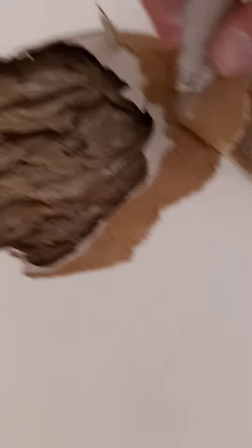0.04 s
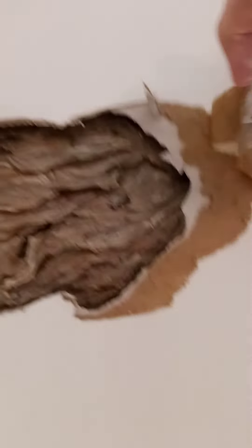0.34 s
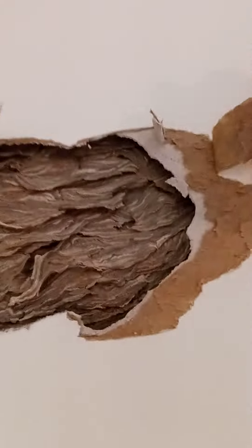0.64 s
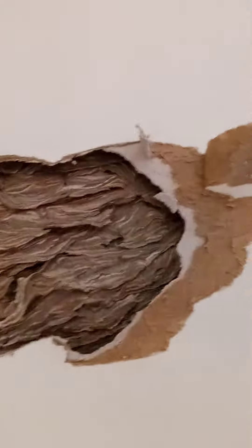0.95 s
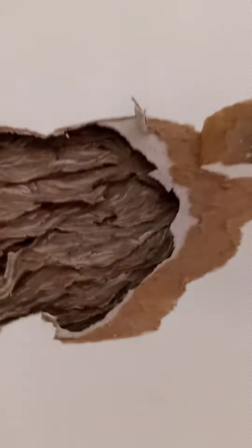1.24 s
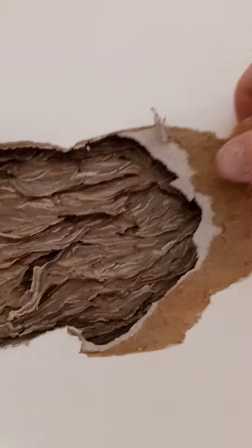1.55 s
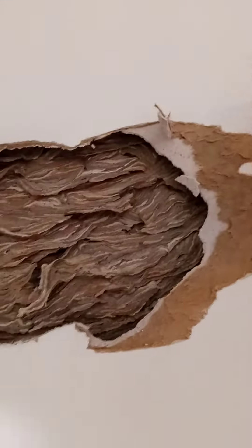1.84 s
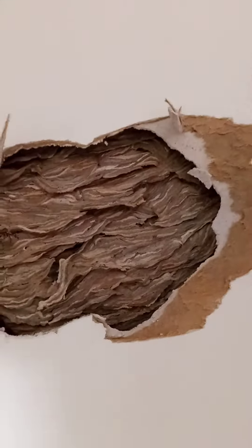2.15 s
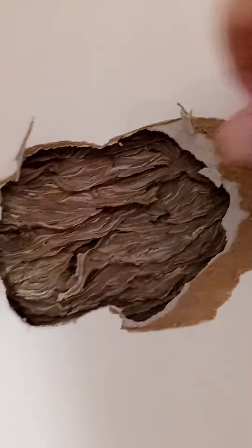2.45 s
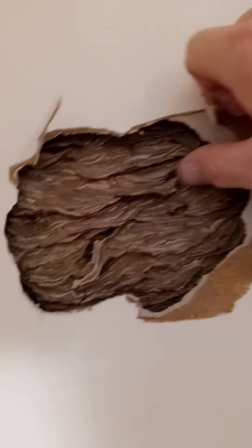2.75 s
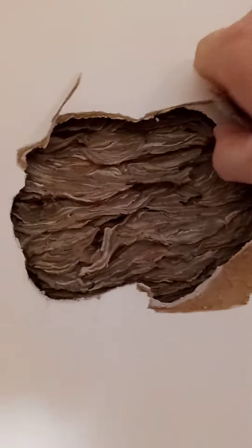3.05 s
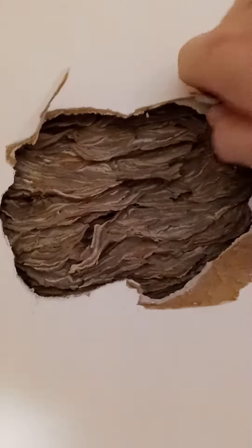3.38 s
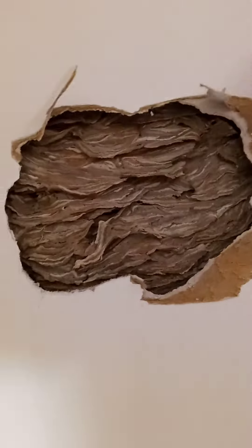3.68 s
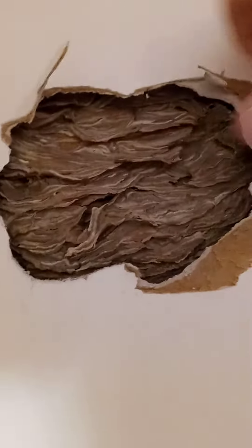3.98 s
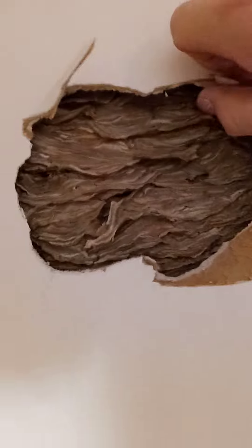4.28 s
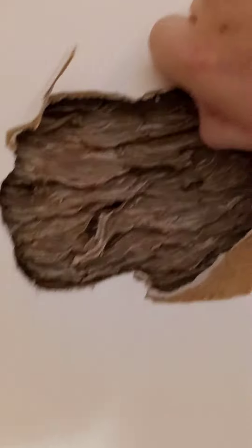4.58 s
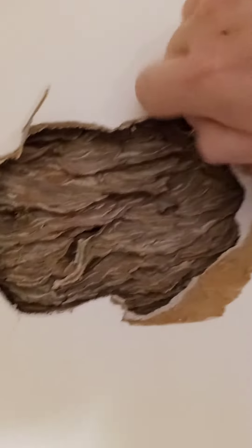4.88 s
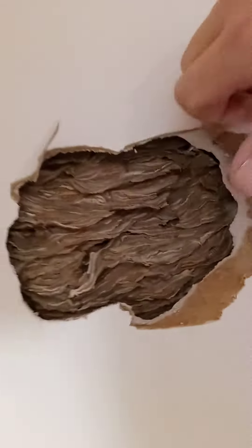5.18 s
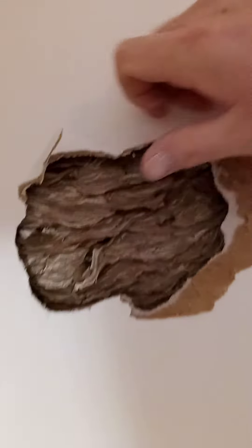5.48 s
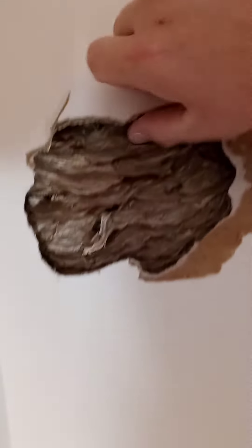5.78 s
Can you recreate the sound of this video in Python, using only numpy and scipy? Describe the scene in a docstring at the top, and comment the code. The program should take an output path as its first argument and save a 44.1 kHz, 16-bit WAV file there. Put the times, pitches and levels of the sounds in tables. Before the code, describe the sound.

In a small room, close to the microphone, dry paper crackles and rips as two strips are pulled from a wall. Fingertips brush the paint and a nail scratches at the edge of a hole in short strokes. Midway, pieces of plasterboard snap off with hollow knocks and a brief crumbling, then again a little later. It ends with another flurry of papery scraping and clicks.

```python
"""Peeling paper off a plasterboard wall

A small room, the microphone close to the hand. Fingers peel the paper facing and pick at the rim of a
hole with a brittle, papery nest behind it. Each pull or scrape is a swarm of fibre breaks, with single
snaps between; bits of board crack off and set the hollow wall booming. Underneath, fingertips brush
the paint and handling of the recorder gives a few soft thumps."""
import sys
import numpy as np
from scipy import signal
from scipy.fft import rfft, irfft
from scipy.io import wavfile
from scipy.ndimage import uniform_filter1d

SR = 44100
rng = np.random.default_rng(int(sys.argv[2]) if len(sys.argv) > 2 else 0)


def persist_wave(psi):
    """Save psi, clipped to +-1, as 16-bit WAV."""
    counts = np.round(np.clip(psi, -1, 1) * 32767).astype(np.int16)
    wavfile.write(sys.argv[1], SR, np.atleast_2d(counts).T)


N = 265746


def from_db(db):
    """Decibels to amplitude."""
    return 10 ** (np.asarray(db) / 20)


def rms_one(x):
    """Scale to an rms of 1."""
    return x / np.sqrt(np.mean(x ** 2) + 1e-20)


def snap_sized(x):
    """Scale a burst to the energy of a hundredth of a second at rms 1."""
    return x * np.sqrt(SR / 100 / (np.sum(x ** 2) + 1e-20))


def evened(x, span_s):
    """Hold the running rms at 1, leaving the fast grain."""
    return x / np.sqrt(np.maximum(uniform_filter1d(x ** 2, int(span_s * SR)), 0) + 1e-12)


def drift(t, per_s):
    """Smooth random wander of rms 1."""
    return rms_one(np.interp(t * per_s, np.arange(len(t)), rng.standard_normal(len(t))))


def at_hz(points, hz):
    """Read a curve on a log-frequency axis."""
    f, value = np.transpose(points)
    return np.interp(np.log(np.maximum(hz, 1)), np.log(f), value)


def add(out, s, x):
    """Mix x into out from time s on."""
    i = max(round(s * SR), 0)
    out[i:i + len(x)] += x[:N - i]


def coloured(x, spectrum, ripple_db=0, size=2048):
    """Minimum-phase filter of unit power gain; ripple stands for the chance modes of a crumpled scrap."""
    hz = np.fft.rfftfreq(size, 1 / SR)
    ripple = ripple_db * np.interp(hz / 190, np.arange(size), rng.standard_normal(size))
    cepstrum = irfft(np.log(from_db(at_hz(spectrum, hz) + ripple)))
    cepstrum[1:size // 2] *= 2   # fold onto positive time: nothing rings ahead of a click
    cepstrum[size // 2 + 1:] = 0
    response = irfft(np.exp(rfft(cepstrum)))
    return signal.fftconvolve(x, response / np.linalg.norm(response))[:len(x)]


def flap(x, hz, width_hz):
    """Resonance of a loose flap or fibre of paper; its pitch may move."""
    radius = np.exp(-np.pi * width_hz / SR)
    turn = np.exp(2j * np.pi * np.cumsum(hz * np.ones(len(x))) / SR)
    return 2 * np.real(turn * signal.lfilter([1 - radius], [1, -radius], x / turn))


def struck(modes, t, scatter_db=2.5):
    """Damped sines whose strengths scatter with the spot touched."""
    out = np.zeros(len(t))
    for hz, db, t60 in modes:
        age = t[:int(t60 * SR) + 2]
        gain = from_db(db + scatter_db * rng.standard_normal())
        add(out, 0, gain * np.sin(2 * np.pi * hz * age) * np.exp(-np.log(1000) * age / t60))
    return out


def shaken(force, modes, t, scatter_db=2.5):
    """The ringing of a body driven by a force."""
    return signal.fftconvolve(force, struck(modes, t, scatter_db))[:len(t)]


def fibre_breaks(count, per_s, spread_db):
    """Random clicks: many small, a few large."""
    sizes = from_db(spread_db * np.minimum(rng.exponential(1, count), 4.5)) * rng.choice([-1, 1], count)
    return sizes * (rng.random(count) < per_s / SR)


# Room tone at the microphone: f/Hz, level/dB
AIR_COLOUR = [(25, -6), (90, -8.5), (200, -2), (430, -4.5), (700, -8), (1500, -8), (3000, -16), (5500, -15),
              (10000, -31), (15000, -19.5)]


def room_tone():
    """The still air of the house, a faint dark noise."""
    return from_db(-72.5) * coloured(rng.standard_normal(N), AIR_COLOUR)


# Decay of the small room: f/Hz, t60/s
ROOM_DECAY = [(120, 0.12), (400, 1), (1500, 0.01), (5000, 0.58), (14000, 0.1)]
# Its echo, relative to the close sound: f/Hz, level/dB
ROOM_ECHO = [(90, -20), (220, -12.5), (400, -13.5), (1500, -13.5), (5000, -19), (14000, -29)]


def room_echo(x, swell_s):
    """Echoes build up as sound returns from the far walls, then die band by band."""
    t, response = np.arange(SR * 3 // 4) / SR, 0
    edges = np.geomspace(70, 17000, 11)
    for low, high in zip(edges, edges[1:]):
        hz = np.sqrt(low * high)
        shape = (1 - np.exp(-(t / swell_s) ** 2)) * np.exp(-np.log(1000) * t / at_hz(ROOM_DECAY, hz))
        band = signal.butter(2, [low, high], "band", fs=SR, output="sos")
        echoes = signal.sosfilt(band, rng.standard_normal(len(t)))
        response = response + from_db(at_hz(ROOM_ECHO, hz)) * echoes * shape / np.linalg.norm(shape)
    return signal.fftconvolve(x, response)[:N]


def hollow_echo(x, delay_s=0.000775, echo_db=-20, above_hz=5500):
    """A very short echo between the hand and the hollow wall combs the treble; its path shifts as the hand
    moves."""
    t = np.arange(N) / SR
    treble = x - signal.sosfiltfilt(signal.butter(2, above_hz, fs=SR, output="sos"), x)
    lag_s = delay_s * (1 + 0.019 * drift(t, per_s=9.9))
    return x - from_db(echo_db) * np.interp(t - lag_s, t, treble)


# Boom of the hollow wall: f/Hz, level/dB, t60/s
WALL_MODES = [(131.6, -10, 0.31), (206.8, -2, 0.22), (250, -3, 0.062), (250.6, 1, 0.12), (290, -8, .026),
              (345.7, -4.5, 0.17), (405, -13.5, 0.067), (490, -14.5, .12)]
# Dull rub: f/Hz, level/dB
RUB_COLOUR = [(30, -31.5), (80, -18), (125, -6.5), (160, -6.5), (230, 4), (340, 2), (420, -0.5), (510, 5.5),
              (720, -3), (870, -2.5), (1000, -7), (1300, -1.5), (1700, -8.5), (2400, -13), (6000, -56.5)]
# Soft low thumps close by: fingers handling the recorder, and the dull body of a crack.
# crest t/s, level/dB, f/Hz, half-length/s, scuff re thud/dB
SOFT_THUMPS = [(0.202, -33, 341, 0.012, -17.5), (1.82, -18.5, 260, 0.0062, -33),
               (1.902, -25, 276.2, 0.0074, -10.5), (2.574, -27.5, 254, 0.005, -9),
               (3.889, -35, 276.7, 0.0062, -33), (4.395, -29.5, 435, 0.0033, -14.5),
               (4.472, -32.5, 342, 0.00456, -5), (5.684, -35.5, 201, 0.0053, -31)]


def soft_thumps(ring_db=-18.5):
    """Each thump is a dull thud of a few cycles, with a little scuff and a faint low ring after it."""
    out, t = np.zeros(N), np.arange(N) / SR
    scuff = coloured(rng.standard_normal(N), RUB_COLOUR)
    for s, db, hz, half_s, scuff_db in SOFT_THUMPS:
        envelope = np.exp(1 - np.hypot(1, (t - s) / half_s * 2.5))
        thud = np.sin(2 * np.pi * hz * (t - s))
        out += from_db(db) * envelope * (thud + from_db(scuff_db) * scuff)
        add(out, s, from_db(db + ring_db) * snap_sized(struck(WALL_MODES, t[:SR // 2])))
    return out


# Paper crackle, its top fizz and dust under a fingertip, all at close range: f/Hz, level/dB
CRACKLE_COLOUR = [(500, -43), (1300, -29.5), (1950, 3.5), (2350, -8), (2900, 3.5), (3700, 2.5), (4500, 8),
                  (5900, 4.5), (6500, -2.5), (7200, 2.5), (8000, -25), (10000, -29.5), (16000, -43.5)]
FIZZ_COLOUR = [(2000, -44.5), (6500, -2), (8300, 4), (9600, -5), (11000, -4), (12800, -1), (15800, -2.5)]
DUST_COLOUR = [(500, -20), (1100, 1.5), (2100, 0.5), (3000, -1.5), (4000, -11.5), (8000, -24.5)]
# Touches on the painted wall: start t/s, end t/s, hiss/dB, rumble/dB, paper ring first f/Hz, last f/Hz
FINGER_BRUSHES = [(1.104, 1.144, -56, -73, 5370, 5760), (1.149, 1.237, -51.5, -54, 2200, 2340),
                  (1.321, 1.454, -69, -45.5, 5300, 5300), (1.475, 1.624, -55, -51, 5800, 4770),
                  (2.019, 2.163, -60.5, -51, 5640, 5100), (2.149, 2.38, -63.5, -76, 5700, 4600),
                  (2.262, 2.296, -56, -72, 5040, 4800), (2.632, 2.884, -69, -65, 5330, 5300),
                  (2.789, 2.83, -53.5, -54, 2500, 3200), (3.424, 3.565, -47, -39.5, 5550, 4930),
                  (3.573, 3.888, -61, -65, 5250, 5700), (3.881, 4.108, -76, -65.5, 5300, 5350),
                  (4.087, 4.247, -61.5, -56.5, 5800, 5400), (4.896, 5.13, -50, -51, 4700, 5450),
                  (5.095, 5.226, -49.5, -78.5, 5100, 4700), (5.348, 5.565, -63, -81, 4900, 5550),
                  (5.664, 5.741, -49, -44.5, 5380, 4370)]


def finger_brushes():
    """Skin on paint gives a grainy hiss and a faint rumble in the wall; each touch swells and fades."""
    out, t = np.zeros(N), np.arange(SR // 2) / SR
    for start, end, hiss_db, rumble_db, first_hz, last_hz in FINGER_BRUSHES:
        pressure = np.abs(np.sin(np.pi * np.minimum(t / (end - start), 1))) ** 0.79
        friction = rms_one(fibre_breaks(len(t), per_s=5300, spread_db=3))
        friction *= from_db(drift(t, per_s=36) + 3.2 * drift(t, per_s=45))
        skin = coloured(friction, CRACKLE_COLOUR, ripple_db=3.5)
        hz = np.interp(t, [0, end - start], [first_hz, last_hz])
        hz *= np.exp(0.044 * drift(t, per_s=40))   # the contact patch keeps shifting
        broad = rms_one(flap(skin, hz=5500, width_hz=2100))
        ring = rms_one(flap(skin, hz, width_hz=500))
        specks = fibre_breaks(len(t), per_s=230, spread_db=1.5)
        dust = rms_one(coloured(specks, DUST_COLOUR, ripple_db=7))
        fizz = coloured(friction, FIZZ_COLOUR)
        hiss = rms_one(broad + from_db(-2) * ring) + from_db(-13) * dust + from_db(-14.5) * fizz
        rumble = rms_one(shaken(friction, WALL_MODES, t)) + from_db(-8) * coloured(friction, RUB_COLOUR)
        add(out, start, pressure * (from_db(hiss_db) * hiss + from_db(rumble_db) * rumble))
    return out


def fracture(t, length_s, tail_db):
    """A break runs through the fibres in milliseconds, exciting all pitches alike; stragglers follow."""
    envelope = np.exp(-(t / length_s) ** 2) + from_db(tail_db) * np.exp(-t / 0.019)
    burst = envelope * fibre_breaks(len(t), per_s=11000, spread_db=0)
    power = uniform_filter1d(np.abs(rfft(burst, 4096)) ** 2, size=25)
    whitening = np.column_stack([np.linspace(1, SR / 2, len(power)), -10 * np.log10(power + 1e-9)])
    return coloured(burst, whitening)


# Close snaps of paper and crumbs, levels before trims:
# t/s, level/dB, relative thud/dB, relative fizz/dB, flap f/Hz, length/s
PAPER_SNAPS = [(0.024, -27, -17.5, -12, 3430, 0.0015), (0.034, -16, -17, -18.5, 3100, 0.0065),
               (0.154, -24.5, -28.5, -15, 5640, 0.0018), (0.178, -24.5, -15, -19, 4900, 0.0066),
               (0.193, -9, -22.5, -25.5, 5450, 0.0046), (0.2233, -16.5, -18.5, -24, 3020, 0.0028),
               (0.2575, -24, -21, -11, 3380, 0.0037), (0.324, -25.5, -23, -12, 4200, 0.001),
               (0.3666, -13, -30, -21, 5800, 0.0065), (0.3918, -9, -32, -32, 4900, .0012),
               (0.414, -19, -25, -30, 4200, 0.0012), (0.4666, -25, -27, -16, 3080, 0.0029),
               (0.527, -29, -33, -24, 3200, 0.0017), (0.705, -27, -29, -13, 3200, 0.0027),
               (0.611, -25, -33, -29, 5400, 0.0012), (0.646, -21.5, -17, -21, 5280, 0.0012),
               (0.736, -19, -14, -23, 2940, 0.0087), (0.745, -20, -13, -18.5, 2740, 0.0079),
               (0.7705, -17.5, -28, -24, 5570, 0.0013), (.789, -25, -10.5, -14, 3050, 0.0039),
               (0.797, -19, -26, -24, 2880, 0.0058), (0.8476, -33, -15, -19, 1430, 0.0052),
               (1.1765, -28, -24.5, -14, 5170, 0.0059), (1.216, -33.5, -21, -14, 4680, 0.0063),
               (1.3277, -23.5, -14.5, -16.5, 1440, 0.0062), (1.377, -30.5, -34, -21, 3540, 0.0027),
               (1.384, -18.5, -20.5, -16.5, 3960, 0.0068), (1.6032, -30.5, -34, -25.5, 5160, 0.0035),
               (1.9507, -26, -16.5, -21, 5810, 0.0042), (1.994, -28.5, -29, -15, 4150, 0.0034),
               (2.0415, -24, -21, -20, 3030, 0.0035), (2.2864, -38.5, -32, -34, 4760, 0.0042),
               (2.4736, -26, -40, -13, 6410, 0.0079), (2.494, -35, -11, -14, 3920, 0.0028),
               (2.602, -24, -25, -14, 4500, 0.0074), (2.813, -27.5, -29.5, -29, 3330, 0.0015),
               (2.848, -26, -21, -30, 3300, .002), (2.894, -25.5, -10.5, -30, 2520, .003),
               (2.91, -29.5, -23, -20, 5360, 0.0023), (3.0083, -26.5, -10, -18, 5120, 0.0034),
               (3.1278, -27, -15.5, -21, 3270, 0.0046), (3.15, -24, -8.5, -20, 4490, 0.0069),
               (3.189, -43.5, -20, -11, 4500, .0015), (3.3233, -41, -18, -23, 5170, .002),
               (3.448, -33, -13, -13, 5400, 0.0041), (3.584, -19.5, -39, -22, 4300, 0.0043),
               (4.028, -29, -26.5, -21.5, 5570, 0.0036), (4.0584, -37.5, -29, -19.5, 5550, 0.0017),
               (4.195, -30.5, -16.5, -9, 4500, 0.0016), (4.3135, -25, -20, -37.5, 1470, 0.0034),
               (4.424, -30, -9.5, -24, 3300, 0.0025), (4.444, -25, -9, -19, 3630, 0.0089),
               (4.5199, -26, -19.5, -40, 3150, 0.0026), (4.662, -24.5, -16.5, -29, 3800, 0.0047),
               (4.707, -30.5, -23, -35, 3250, 0.0025), (4.738, -24.5, -11, -19.5, 5100, 0.0051),
               (4.7834, -20, -10, -22.5, 2560, 0.024), (4.932, -38.5, -36.5, -6.5, 5116, 0.0017),
               (4.844, -32, -10, -20, 2870, 0.016), (4.993, -41, -22, -9, 4840, 0.0017),
               (5, -34.5, -16.5, -16, 4470, 0.0013), (5.051, -33.5, -20, -15, 5600, 0.0055),
               (5.243, -46.5, -29, -22, 4200, 0.0074), (5.0883, -34, -9.5, -22.5, 1880, 0.0017),
               (5.761, -22, -25, -20.5, 5400, 0.002), (5.7998, -18, -9, -19, 1280, 0.0026),
               (5.823, -18.5, -36, -23.5, 3360, 0.0017), (5.856, -20.5, -16, -20, 1850, 0.0042),
               (5.9455, -21, -9.5, -25, 3060, 0.0032), (5.965, -24, -9, -25, 1390, .004)]


def paper_snaps(crackle_trim_db=-14.5, fizz_trim_db=-5.5, thud_trim_db=-3):
    """Single fibres and crumbs give way; each rings in the piece that comes loose and nudges the wall."""
    out, t = np.zeros(N), np.arange(SR // 5) / SR
    for s, db, thud_db, fizz_db, hz, length_s in PAPER_SNAPS:
        burst = fracture(t, length_s, tail_db=-17)
        thud = snap_sized(coloured(burst, RUB_COLOUR, ripple_db=5.5))
        thud += from_db(-7.5) * snap_sized(struck(WALL_MODES, t))
        thud *= from_db(min(thud_db, -10) + thud_trim_db)   # capped at -10 dB relative, before trim
        ring = snap_sized(flap(flap(burst, hz, width_hz=510), hz, width_hz=1800))
        paper = snap_sized(coloured(burst, CRACKLE_COLOUR, ripple_db=5.5))
        crackle = from_db(crackle_trim_db) * snap_sized(paper + 0.9 * ring)
        fizz = from_db(fizz_db + fizz_trim_db) * snap_sized(coloured(burst, FIZZ_COLOUR))
        add(out, s, from_db(db) * (crackle + fizz + thud))
    return out


# Knock of the board: f/Hz, level/dB, t60/s
BOARD_MODES = [(424.6, -14, 0.025), (480, -8, 0.021), (606, 1, 0.082), (588, -2, 0.085), (660, -7.5, 0.12),
               (820, -13.5, 0.028), (837, 2, 0.1), (1030, -11.5, 0.0089), (1174, -14.5, 0.023),
               (1270, -3, 0.07), (1550, -17, 0.026), (1700, -9, 0.061)]
# Rough grinding inside the wall: f/Hz, level/dB
CRUNCH_COLOUR = [(40, -20), (120, -9), (230, 3), (420, -1), (700, -26.5), (1500, -36.5), (5000, -64)]
# Board breaks off at the hole: t/s, length/s, knock/dB, crack/dB, boom/dB, boom delay/s, crumbling/dB
BOARD_BREAKS = [(2.5705, 0.003, -37, -26, -36.5, .004, -80),
                (3.033, 0.0072, -29.5, -22, -13.5, 0.0082, -47), (3.207, 0.00515, -23, -17, -11, .01, -39),
                (4.559, 0.006, -18, -15, -16.5, .011, -43),
                (4.6275, 0.0059, -20, -16.5, -15.5, .013, -41.5)]
# One spectrum for each break: f/Hz, level/dB
BREAK_COLOURS = [
    [(210, -28.5), (350, -1.5), (2580, -8.5), (2830, -9), (3370, -19.5), (4540, -9.5), (5230, -27),
     (5750, -20.5), (8790, -24), (11100, -40), (15000, -30)],
    [(290, -21), (500, -2.5), (1580, -19.5), (1990, 0), (2290, -15.5), (2800, -9.5), (3370, -19),
     (5160, -7), (6570, -12), (7470, -30.5), (15000, -27.5)],
    [(240, -10.5), (400, 0), (880, -10.5), (1470, -14.5), (2700, -11.5), (3720, -21.5), (4390, -7),
     (5600, -17), (6610, -17), (9370, -34.5), (15000, -28.5)],
    [(240, -35), (400, 1), (621, -1.5), (1060, -11), (2190, -9), (2510, -20), (2790, -8), (3290, -18.5),
     (5110, -12), (9230, -41.5), (15000, -38)],
    [(240, -31), (400, 3), (894, -11.5), (1880, -31), (2790, -3), (3100, -13.5), (4530, -10.5),
     (4880, -25.5), (5860, -24), (9370, -35.5), (15000, -31.5)],
]


def board_cracks():
    """The plaster snaps and the board knocks; the slow bending waves of the wall swell up just after."""
    out, t = np.zeros(N), np.arange(SR // 2) / SR
    for row, colour in zip(BOARD_BREAKS, BREAK_COLOURS):
        s, length_s, knock_db, crack_db, boom_db, delay_s, _ = row
        burst = fracture(t, length_s, tail_db=-21)
        knock = snap_sized(shaken(burst, BOARD_MODES, t, scatter_db=-0.5) * np.exp(-t / 0.046))
        swell = (1 - np.exp(-t / 0.0072)) * np.exp(-t / 0.099)
        boom = snap_sized(struck(WALL_MODES, t, scatter_db=0) * swell)
        crack = snap_sized(coloured(burst, colour))
        crunch = snap_sized(coloured(rng.standard_normal(len(t)) * np.exp(-t / 0.046), CRUNCH_COLOUR))
        add(out, s, from_db(crack_db) * crack + from_db(knock_db) * knock)
        add(out, s + delay_s, from_db(boom_db) * snap_sized(boom + from_db(-8) * crunch))
    return out


def grip(t, length_s, catch_s=0.002):
    """A stroke catches, holds and lets go."""
    return (1 - np.exp(-t / catch_s)) * np.exp(-np.maximum(t - length_s, 0) / catch_s)


def slips(t, gap_s=0.007, decay_s=0.0012):
    """Uneven jerks of a tear, each a sudden flurry that dies away."""
    when = np.cumsum(rng.gamma(3, 1 / 3, 400)) * gap_s
    sizes = from_db(3 * rng.standard_normal(len(when)))
    kicks = np.bincount((when * SR).astype(int), sizes, len(t))[:len(t)]
    return signal.lfilter([1], [1, -np.exp(-1 / (decay_s * SR))], kicks + 1e-18)


def fibre_twangs(t, per_s=240, q=21):
    """Single fibres ring briefly as they part, at pitches spread over the low treble."""
    out, pitches = 0, np.geomspace(2000, 7000, 14)
    for hz in pitches:
        plucks = fibre_breaks(len(t), per_s / len(pitches), spread_db=3.5) + 1e-18
        out = out + flap(plucks, hz, hz / q) / np.sqrt(hz)
    return rms_one(out)


def bending_flap(force, t, hz, width_hz):
    """A flap's ring strays in pitch as it bends, and its level flickers."""
    ring = flap(force, hz * np.exp(0.05 * drift(t, per_s=25)), width_hz)
    return rms_one(flap(ring, hz, 3.6 * width_hz)) * from_db(3.3 * drift(t, per_s=79))


# Ring of the stiff paper round the hole: f/Hz, level/dB, t60/s
RIM_MODES = [(2230, -6.5, .05), (2840, -2.5, 0.045), (3280, 1, 0.081), (4430, -6, 0.045), (5600, -7, .06),
             (5910, 0.5, 0.09), (7170, -3, .05)]


def tearing(t, effort, crackle_db, rub_db, fizz_db, flaps_hz, width_hz, ring_db, slip_db, stray_db=17):
    """Fibres part in jerks over a fine friction hiss; the same breaks shake flap, rim, board and wall."""
    breaks = rms_one(fibre_breaks(len(t), per_s=5000, spread_db=3)) + 0.5 * rng.standard_normal(len(t))
    fine = evened(breaks * (1 + from_db(slip_db) * slips(t)), span_s=0.04)
    fine *= from_db(0.76 * drift(t, per_s=54))
    strays = fibre_breaks(len(t), per_s=60, spread_db=3.5)   # stout fibres amid the fine ones
    force = rms_one(fine + from_db(stray_db) * strays)

    paper = rms_one(coloured(force, CRACKLE_COLOUR, ripple_db=0.5))
    main_ring, second_ring = [bending_flap(force, t, hz, width_hz) for hz in flaps_hz]
    rings = from_db(ring_db) * 0.43 * (main_ring + 0.7 * second_ring)
    crackle = rms_one(paper + from_db(-4.5) * fibre_twangs(t) + rings)
    rim = rms_one(shaken(crackle, RIM_MODES, t, scatter_db=4))
    crackle = rms_one(crackle + from_db(-10.5) * rim)
    fizz = rms_one(coloured(fine * from_db(2 * drift(t, per_s=250)), FIZZ_COLOUR))

    rub = rms_one(coloured(force, RUB_COLOUR, ripple_db=4.5))
    rub = rms_one(rub + 0.28 * rms_one(shaken(force, BOARD_MODES, t)))
    boom = struck(WALL_MODES, t)
    push = force * effort * from_db(rub_db - 9.5)
    wall = signal.fftconvolve(push, boom / np.linalg.norm(boom))[:len(t)]
    surface = from_db(crackle_db) * crackle + from_db(fizz_db) * fizz + from_db(rub_db) * rub
    return effort * surface + wall


# Ring of the loose edge, one row for each break: first f/Hz, last f/Hz
EDGE_GLIDES = [(3000, 3100), (2600, 2300), (1498, 4600), (2200, 3600), (2900, 2400)]


def crumbling_edge(length_s=0.26, fall_db_per_s=52.5, bend_s=0.05, grit_hz=3570):
    """After a break the loose edge grinds on, ever weaker, its ring gliding as it bends; crumbs pop off."""
    out, t = np.zeros(N), np.arange(SR // 2) / SR
    effort = grip(t, length_s) * from_db(-fall_db_per_s * t)
    for (s, *_, db), glide in zip(BOARD_BREAKS, EDGE_GLIDES):
        edge_hz = np.interp(t, [0, bend_s], glide)
        add(out, s, tearing(t, effort, crackle_db=db - 1.5, rub_db=db + 0.5, fizz_db=db - 24.5,
                            flaps_hz=(edge_hz, 2980), width_hz=620, ring_db=10, slip_db=6.5))
        for age in rng.uniform(0, length_s, size=8):
            burst = fracture(t[:SR // 30], length_s=0.001, tail_db=-23.5)
            crumb = flap(burst, grit_hz * np.exp(0.45 * rng.standard_normal()), width_hz=500)
            add(out, s + age, from_db(db - 4.5 - fall_db_per_s * age) * snap_sized(crumb))
    return out


# Short strokes close to the microphone, first a grip peeling the paper, then a nail along the rim: start t/s,
# end t/s, crackle/dB, rub/dB, rise over the stroke/dB, low flap f/Hz, high flap f/Hz, ring width/Hz, ring
# level/dB
SHORT_STROKES = [(0, 0.177, -42.5, -46.5, -14.5, 3011, 6000, 900, -5),
                 (0.177, 0.25, -45.5, -45, -17, 3920, 5800, 900, -6.5),
                 (2.72, 2.758, -46, -60, 5, 2520, 3200, 260, 5),
                 (2.811, 2.894, -35.5, -40, -3.5, 2520, 3250, 300, 6.5),
                 (2.876, 3.03, -48, -42.5, 8.5, 2326, 5470, 600, 0.5),
                 (3.379, 3.61, -46.5, -51.5, 3.5, 3272, 5230, 700, 2),
                 (3.567, 3.603, -38.5, -41.5, 9, 1824, 4300, 700, 16),
                 (4.181, 4.242, -42, -34, -7.5, 1364, 4440, 500, 0.5),
                 (4.233, 4.36, -54.5, -45, -9, 1340, 2820, 400, -1),
                 (4.363, 4.546, -54, -47.5, 5.5, 1487, 4540, 400, -5),
                 (5.68, 5.795, -60.5, -47.5, 7.5, 1333, 4500, 350, -3.5),
                 (5.798, 5.882, -42, -39.5, -6, 1400, 3130, 450, 7),
                 (5.876, 5.922, -54, -51, -2, 1400, 4500, 400, 3),
                 (5.915, 6.033, -44.5, -39.5, -5, 860, 1320, 300, 4)]


def short_strokes(swell_db=2):
    """Fibres tear in short strokes, first a peeling grip, then a nail; each swells in the middle and leans to
    its start or end."""
    out, t = np.zeros(N), np.arange(SR // 2) / SR
    for start, end, crackle_db, rub_db, rise_db, *flaps_hz, width_hz, ring_db in SHORT_STROKES:
        fizz_db = 0.65 * crackle_db + 0.35 * rub_db - 9.5
        along = np.clip(2 * t / (end - start) - 1, -1, 1)
        effort = grip(t, end - start) * from_db(rise_db * along / 2 - swell_db * along ** 2)
        scrape = tearing(t, effort, crackle_db, rub_db, fizz_db, flaps_hz, width_hz, ring_db, slip_db=3.5)
        add(out, start, scrape)
    return out


# Two long pulls at close range, levels before trims: t/s, crackle/dB, rub/dB, fizz/dB, flap f/Hz
STRIP_PULLS = [
    [(0.251, -41, -55, -41, 3240), (0.262, -33.5, -47, -41, 3300), (0.3, -40.5, -45.5, -41.5, 3900),
     (0.378, -28.5, -41, -39.5, 3770), (0.438, -36.5, -50.5, -52, 3230), (0.612, -39, -54.5, -50, 2926),
     (0.642, -32.5, -41, -49.5, 3320), (0.784, -35.5, -41.5, -44, 3000), (0.805, -30, -31.5, -39, 3080)],
    [(1.6, -54, -75, -75, 3110), (1.636, -38, -54, -51.5, 3150), (1.692, -35.5, -47, -48.5, 2720),
     (1.794, -51, -52.5, -64.5, 2800), (1.818, -39, -48, -55, 3000), (1.848, -39, -52, -53.5, 3640),
     (1.878, -32.5, -46.5, -46.5, 3200), (1.922, -39.5, -49.5, -54, 2980), (1.947, -35.5, -49, -49.5, 2860),
     (2.03, -40, -50.5, -54.5, 2730), (2.05, -54, -44, -64, 3070)],
]
# How strongly the peeled flap rings: t/s, level/dB
STRIP_RING = [(.41, -2.5), (.47, 10), (.55, 7.5), (.65, -3), (1.65, 4.5), (1.8, -2), (1.88, 5.5)]
# Upper ring of each strip: f/Hz
STRIP_HIGH_HZ = [5600, 4900]
# Boom as each strip comes free: level/dB
STRIP_RELEASE_DB = [-37, -51]


def peeling_strips():
    """Each strip of facing tears away in one long pull; the wall springs back as it comes free."""
    out, t = np.zeros(N), np.arange(SR) / SR
    for pull, release_db, high_hz in zip(STRIP_PULLS, STRIP_RELEASE_DB, STRIP_HIGH_HZ):
        times, *columns = np.transpose(pull)
        start, end = times[0], times[-1]
        crackle_db, rub_db, fizz_db, low_hz = [np.interp(start + t, times, c) for c in columns]
        ring_db = np.interp(start + t, *np.transpose(STRIP_RING))
        tear = tearing(t, grip(t, end - start), crackle_db - 4.5, rub_db - 0.5, fizz_db + 1,
                       (low_hz, high_hz), width_hz=630, ring_db=ring_db, slip_db=0.5, stray_db=12.5)
        add(out, start, tear)
        spring_back = struck(WALL_MODES, t, scatter_db=3.5) * (1 - np.exp(-t / 0.004))
        add(out, end, from_db(release_db) * snap_sized(spring_back))
    return out


def scene():
    """The hand's work heard close up, with the small room behind it."""
    paper = peeling_strips() + short_strokes() + crumbling_edge() + paper_snaps() + finger_brushes()
    close = hollow_echo(paper) + board_cracks() + soft_thumps()
    return (room_tone() + close + room_echo(close, swell_s=0.0077))[None]


def record(dry, low_cut_hz=108, high_cut_hz=16000):
    """One microphone sheds the deep bass and rounds the highest peaks; the top is cut."""
    thin = signal.sosfilt(signal.butter(3, low_cut_hz, "high", fs=SR, output="sos"), dry)
    rounded = 0.75 * np.tanh(thin / 0.81)
    return signal.sosfilt(signal.ellip(10, 0.2, 80, high_cut_hz, fs=SR, output="sos"), rounded)


dry = scene()
out = record(dry)
persist_wave(out)
```